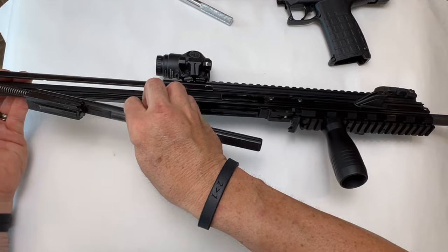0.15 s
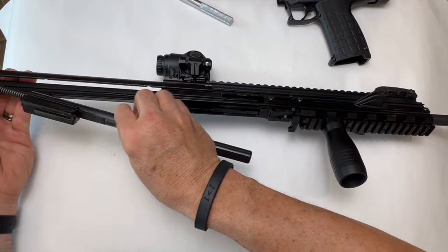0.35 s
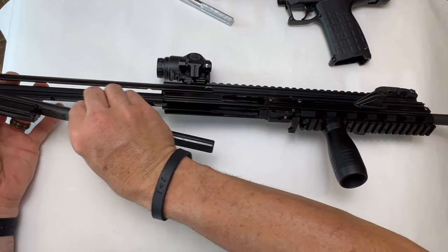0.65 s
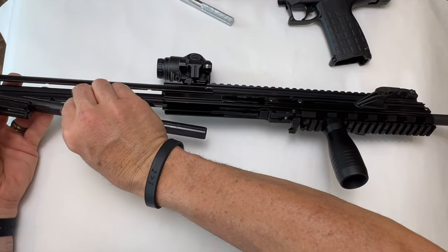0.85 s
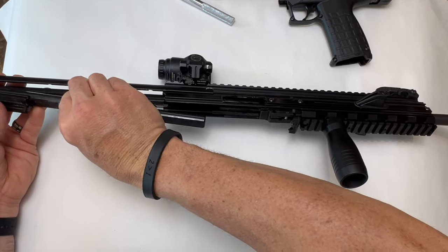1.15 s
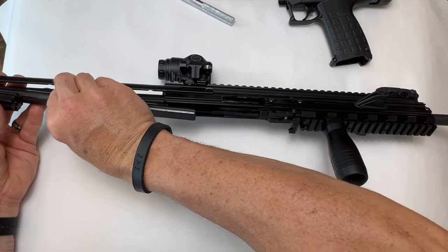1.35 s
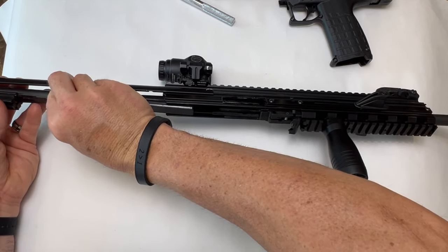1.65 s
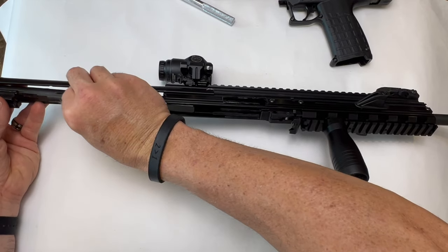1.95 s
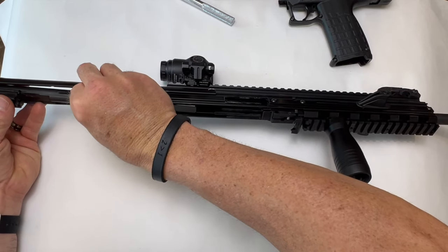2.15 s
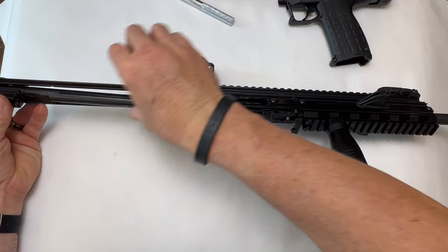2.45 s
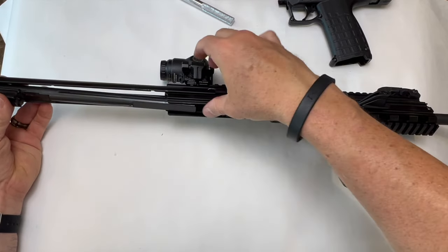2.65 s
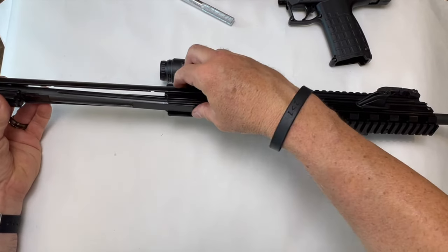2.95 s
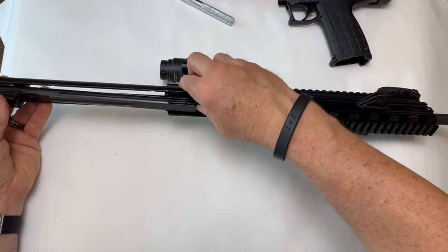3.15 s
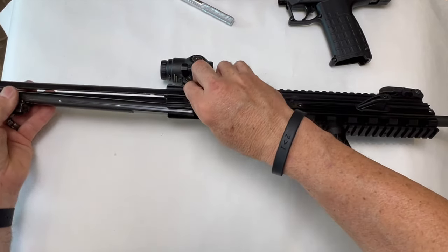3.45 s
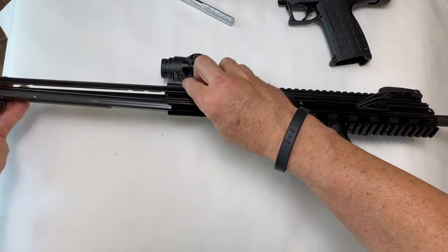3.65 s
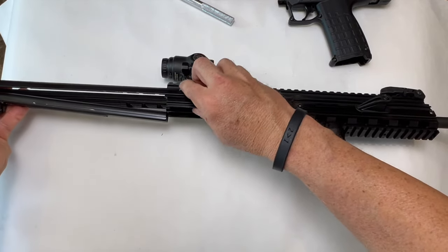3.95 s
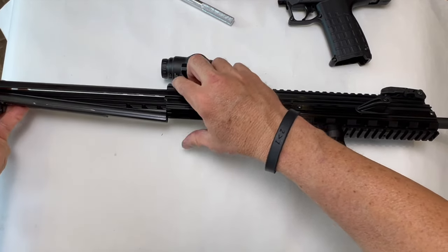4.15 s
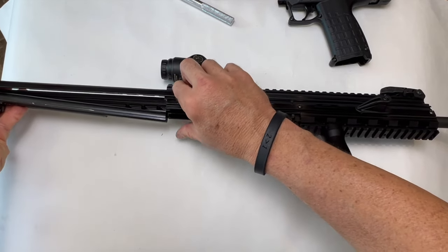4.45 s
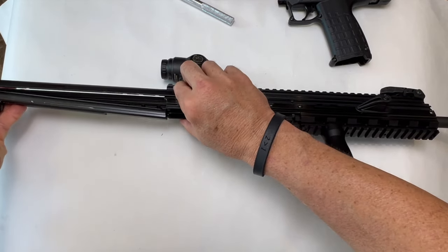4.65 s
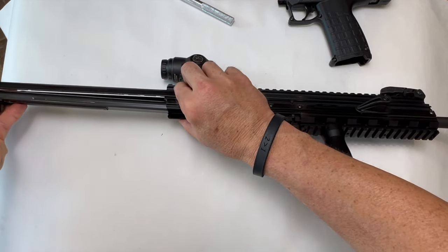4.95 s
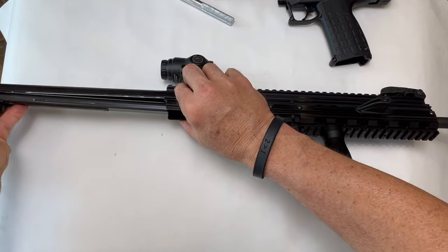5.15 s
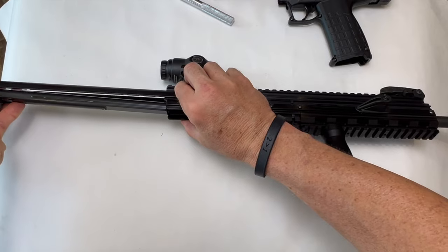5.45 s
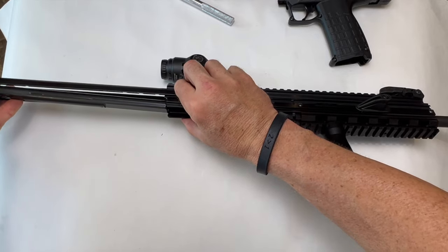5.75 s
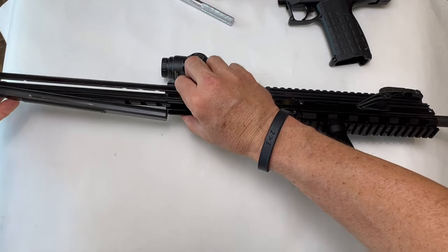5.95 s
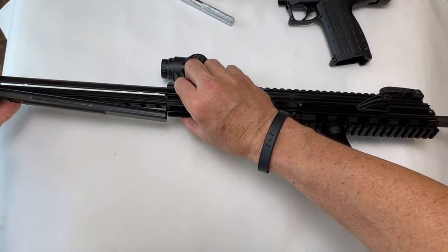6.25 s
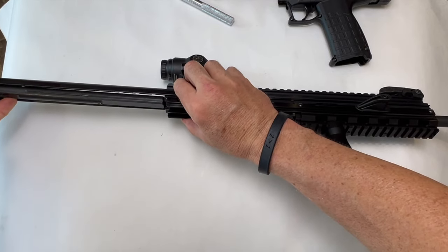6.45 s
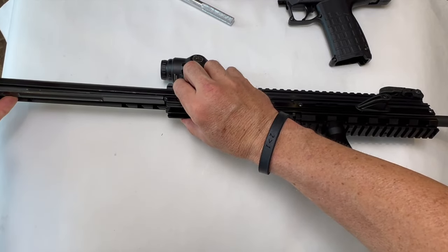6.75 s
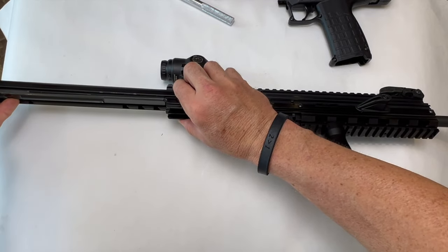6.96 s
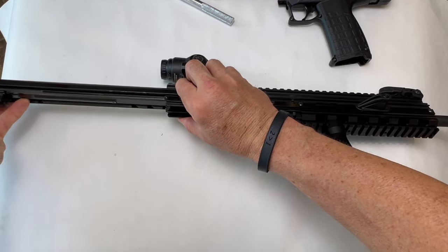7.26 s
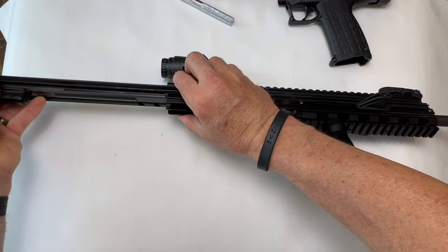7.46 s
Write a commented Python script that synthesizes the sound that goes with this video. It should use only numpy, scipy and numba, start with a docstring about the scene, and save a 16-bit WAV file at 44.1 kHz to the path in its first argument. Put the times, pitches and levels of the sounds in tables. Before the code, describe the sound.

Steel rods rasp in a channel and snap with loud dry knocks and dull table thumps, while a small room hums quietly behind.

```python
"""In a small room, steel and plastic rifle parts are fitted together on a tabletop.
Rods knock and rattle: short noise volleys crack and ring the steel and tube modes.
They also slide and rasp in their channels: uneven stick-slip noise through gliding resonances.
Heavy blows thump the table as soft pushes on its modes; the walls add a decaying noise tail.
Ventilation hums behind: shaped noise, wavering duct tones and a steady motor tone."""
import sys
import numpy as np
from scipy import signal
from scipy.fft import rfft, irfft, next_fast_len
from scipy.io import wavfile
from scipy.ndimage import uniform_filter1d
from numba import njit

SR = 44100
rng = np.random.default_rng(int(sys.argv[2]) if len(sys.argv) > 2 else 0)


def waveform_to_disk(signal):
    """Save audio, clipped to [-1, 1], as 16-bit WAV at the path in sys.argv[1]."""
    frames = np.transpose(np.atleast_2d(signal))
    scaled = np.clip(frames, -1, 1) * 32767
    samples = np.round(scaled).astype(np.int16)
    wavfile.write(sys.argv[1], SR, samples)


N = 335689

# modes of the steel rods and channel: (pitch [Hz], relative level [dB], 60 dB decay time [s])
STEEL_MODES = [(1100, 0, .012), (2200, -1, .02), (2500, 0, .018), (3050, -2, .015), (3400, -2, .018),
               (4220, -4, .02), (5857, -5, .025), (6500, -4, .025), (7000, -2, .018), (8400, -3, .025),
               (9300, -4, .025), (11450, -9, .025)]


def undb(db):
    """Decibels to an amplitude factor."""
    return 10 ** (np.asarray(db) / 20)


def unit(x):
    """Scale to an RMS of 1."""
    return x / np.sqrt(np.mean(x ** 2))


def on_log(curve, hz):
    """Read a (Hz, value) curve on a log frequency axis."""
    f, value = np.transpose(curve)
    return np.interp(np.log(hz + 1), np.log(f + 1), value)


def shape(x, gain):
    """Multiply the spectrum by gain(Hz)."""
    n = next_fast_len(x.shape[-1])
    hz = np.arange(n // 2 + 1) * SR / n
    return irfft(rfft(x, n) * gain(hz), n)[..., :x.shape[-1]]


def band(x, lo, hi):
    """Band-pass between two edges in Hz."""
    return signal.sosfilt(signal.butter(2, [lo, hi], "band", fs=SR, output="sos"), x)


@njit
def moving_band(x, hz, sharp):
    """State-variable band-pass whose centre moves; gain 1 at the centre, Q = sharp."""
    y, b, l, k = np.empty(len(x)), 0., 0., 1 / sharp
    for i in range(len(x)):
        g = np.tan(np.pi * hz[i] / SR)
        v = (b + g * (x[i] - l)) / (1 + g * (g + k))
        b, l, y[i] = 2 * v - b, l + 2 * g * v, k * v
    return y


@njit
def ring_modes(force, owner, poles, gains):
    """Decaying modes driven by a force; each event weighs the modes in its own way."""
    out = np.zeros(len(force))
    for m in range(len(poles)):
        z = 0j
        for i in range(len(force)):
            z = z * poles[m] + force[i] * gains[owner[i], m] + 1e-18
            out[i] += z.imag
    return out


def poles_of(modes):
    """Complex poles, pitches [Hz] and levels [dB] of a mode table."""
    hz, db, t60 = np.transpose(modes)
    return np.exp(2j * np.pi * hz / SR - np.log(1000) / (t60 * SR)), hz, db


def ventilation(air_db=-42.5, motor_hz=58.9, motor_db=-40.5):
    """Broad air rumble with wavering duct tones and a steady motor tone."""
    # air spectrum: (frequency [Hz], relative density [dB per Hz])
    air = [(30, -32), (50, -10), (90, -8), (170, -3), (270, -4), (450, -17), (650, -20), (1100, -30),
           (1900, -41), (3200, -44.5), (5100, -52), (6500, -46), (9500, -66), (15000, -66)]
    # width of the air: (frequency [Hz], side minus mid [dB])
    air_side = [(60, -4), (200, -11), (350, -0.5), (640, 9.5), (1150, 6.5), (2100, 2), (16000, 36)]
    # duct tones: (pitch [Hz], full width at half amplitude [Hz], RMS level [dB])
    duct_tones = [(59.64, 15, -58.5), (118.1, 0.52, -46.5), (207.6, 5.3, -46), (246, 10, -63.5),
                  (310, 11, -71), (358.1, 8.1, -56), (566, 90, -62)]
    mid, side = shape(rng.standard_normal((2, N)), lambda f: undb(on_log(air, f)))
    gain = undb(air_db) / np.sqrt(np.mean(mid ** 2))
    side = shape(side, lambda f: undb(on_log(air_side, f)))
    tones = undb(motor_db) * np.sin(2 * np.pi * motor_hz * np.arange(N) / SR)
    for hz, width, db in duct_tones:
        # a narrow band of noise wavers by itself
        tone = shape(rng.standard_normal(N), lambda f: 1 / (1 + (2 * (f - hz) / width) ** 2))
        tones = tones + undb(db) * unit(tone)
    return gain * np.array([mid + side, mid - side]) + tones


def held_noise(step):
    """Random values, each held for a number of samples."""
    return np.repeat(rng.standard_normal(N // step + 1), step)[:N]


def stroke_pressure(start_s, length_s, swell_db, levels_db):
    """Level curve of each layer: a stroke sets in and dies away, long ones more gently."""
    t = np.arange(N) / SR
    press = np.zeros((len(levels_db), N))
    for start, dur, swell, levels in zip(start_s, length_s, swell_db, undb(levels_db).T):
        i = slice(int(start * SR), int((start + dur + .3) * SR))
        age = t[i] - start
        set_in = np.clip(age / (.012 + .16 * dur), 0, 1)
        let_go = np.exp(-np.clip(age - dur, 0, None) / (.0065 + .043 * dur))
        swelling = undb(swell * (np.clip(age / dur, 0, 1) - .5))
        press[:, i] += levels[:, None] * set_in * let_go * swelling
    return press


def slides(grit_db=2.0, hiss_db=-6, hollow_sharp=3.6, ring_sharp=5.0, upper=1.27,
           slip_db=3.0, slip_ms=5.0, waver=.07, waver_ms=14, steel_db=-7):
    """Uneven stick-slip grit; the free length of rod and channel sets each stroke's resonances."""
    # strokes of sliding contact: (start [s], length [s], swell from start to end [dB], rasp level [dB],
    # hollow pitch [Hz], hollow level [dB], ring pitch [Hz], ring level [dB])
    strokes = [(0.0, 0.081, -29, -74, 1403, -54, 3055, -93),
               (0.102, 0.076, -18, -60.5, 1470, -58.5, 3020, -57.5),
               (0.253, 0.3, 2, -53.5, 1322, -68, 2820, -52.5),
               (.55, 0.25, -4.5, -50, 1136, -62, 3000, -49.5),
               (0.802, 0.23, 4, -51, 1030, -72, 3014, -53.5),
               (1.004, 0.18, -5.5, -41.5, 1020, -38.5, 2462, -44),
               (1.199, 0.067, 11, -37, 1363, -36, 2673, -29.5),
               (1.274, 0.14, 3.5, -41.5, 1570, -44.5, 2610, -37),
               (1.436, 0.069, -14, -38, 1467, -37.5, 2624, -30.5),
               (1.501, 0.021, -15, -33, 1845, -26, 2308, -31),
               (1.689, 0.029, -2, -50, 1230, -50, 2600, -47),
               (1.789, 0.29, 10, -60.5, 1251, -63, 3073, -64),
               (2.335, 0.027, 11, -63, 1743, -63, 2850, -64),
               (3.469, 0.23, 4.5, -34.5, 1500, -48, 3335, -42),
               (3.707, 0.089, -23, -37, 1960, -37, 4010, -37),
               (4.151, 0.11, -17, -57.5, 1324, -81, 3514, -68),
               (4.34, 0.05, 9, -55.5, 1764, -61, 3540, -73), (4.465, 0.2, -1, -61, 1782, -93, 3987, -69),
               (4.628, 0.073, -4, -47.5, 1867, -43.5, 2250, -76),
               (4.71, 0.077, -24, -54, 1810, -50.5, 3880, -48.5),
               (5.329, 0.085, -17, -52.5, 1500, -78, 3285, -55),
               (5.777, .14, 6, -49.5, 1602, -41, 4150, -51),
               (5.925, 0.072, -25, -43.5, 1477, -37, 4000, -43.5),
               (6.254, 0.081, 2, -41.5, 1733, -61, 3983, -43),
               (7.023, 0.068, 4, -70, 1622, -78.5, 3084, -55),
               (7.191, 0.097, -19, -37.5, 1718, -65, 3000, -37),
               (7.286, 0.14, 7, -53, 1690, -80, 3010, -77),
               (7.41, 0.35, -32.5, -49.5, 1773, -81, 3170, -50.5)]
    s, length, swell_db, rasp_db, hollow_hz, hollow_db, ring_hz, ring_db = np.transpose(strokes)
    t = np.arange(N) / SR
    slip_step, waver_step = int(slip_ms * SR / 1000), int(waver_ms * SR / 1000)

    slip = uniform_filter1d(held_noise(slip_step), slip_step // 2)
    grit = rng.standard_normal(N) * undb(grit_db * rng.standard_normal(N) + slip_db * slip)
    fine = grit * undb(-slip_db * slip / 2)  # the rasp runs more evenly

    def wander():
        return uniform_filter1d(held_noise(waver_step), waver_step)

    def resonate(hz, sharp):
        return moving_band(moving_band(grit, hz, sharp), hz, sharp)

    # the hollow pitch bends from stroke to stroke and jumps about
    gliding_hz = np.interp(t, s + length / 2, hollow_hz) * np.exp(waver * wander())
    # the rod keeps its pitch through a stroke, with half the waver
    stroke = np.clip(np.searchsorted(s, t) - 1, 0, None)
    held_hz = ring_hz[stroke] * np.exp(waver / 2 * wander())

    hollow = unit(resonate(gliding_hz, hollow_sharp))
    hollow = hollow + undb(hiss_db) * unit(band(grit, 1200, 3500))
    rod = unit(resonate(held_hz, ring_sharp))
    rod = rod + undb(-3) * unit(resonate(upper * held_hz, ring_sharp))
    rod = rod + undb(hiss_db) * unit(band(grit, 2100, 4000))
    # fast rasping is broad: it spills down over both resonances
    rasp = unit(band(fine, 4800, 14500))
    rasp -= undb(-4.5) * unit(band(fine, 940, 3600))
    # it also sets the steel singing
    poles, _, db = poles_of(STEEL_MODES)
    singing = ring_modes(fine, np.zeros(N, np.int64), poles, undb(db)[None])
    rasp += undb(steel_db) * unit(singing)

    press = stroke_pressure(s, length, swell_db, [hollow_db, ring_db, rasp_db])
    return press[0] * unit(hollow) + press[1] * unit(rod) + press[2] * rasp


def room(x, room_db=-11.5):
    """Decaying noise tail, unrelated at each side; each octave fades at its own rate."""
    # decay of the room: (frequency [Hz], 60 dB decay time [s])
    decay = [(200, 0.19), (2000, 0.46), (10000, 0.32)]
    t, tail = np.arange(SR // 2)[:, None] / SR, 0
    centres = 150 * 2. ** np.arange(7)  # octaves, Hz
    build_up = np.clip(t / 0.009, 0, 1)
    fades = np.exp(-np.log(1000) * t / on_log(decay, centres)) * build_up
    for hz, fade in zip(centres, fades.T):
        tail = tail + fade * band(rng.standard_normal((2, len(t))), hz / 2 ** .5, hz * 2 ** .5)
    tail = tail / np.sqrt(np.sum(tail ** 2) / 2)
    return undb(room_db) * signal.fftconvolve(x[None], tail, axes=1)[:, :N]


def knocks(grit_db=1.5, crack_db=(8, -1, 8), tube_db=-12, buzz_db=-20, buzz_ms=19.0, closing=1.11,
           scatter_db=6, steel_db=-34, tube_hz=1755, tube_t60_s=.022):
    """Each knock is a short volley of tiny impacts: a dry crack and a brief ring of rods and tube."""
    # knocks: (time [s], drive level [dB], low share [dB], high share [dB], tube tone share [dB],
    # rattle time constant [ms], held to 0.3 or more)
    knock_list = [(0.094, -44, 4.5, -3, -22, 0.17), (0.207, -38.5, 3.5, -10, -26, 0.38),
                  (0.821, -18, -57, -38, -21.5, 1.36), (1.007, -18, 7, -0.5, -34, 0.85),
                  (1.024, -17.5, -1.5, -32, -41, 0.87), (1.036, -20.5, 1, -22, -24, 0.99),
                  (1.198, -23, -16, -42, -30, 0.56), (1.215, -33.5, 2.5, -33, -29, 1.5),
                  (1.262, -27, -37, -10, -47, 1), (1.28, -32, -19, -46, -22, 1.3),
                  (1.441, -38, -54, -24, -44, 2.3), (1.496, -25, -54, -0.5, 0, 0.96),
                  (1.509, -28, 6, -41, -47, 1.3), (1.523, -29.5, 11.5, -6, -34, 2.3),
                  (1.530, -25.5, 11, -3, -35, 1.1), (1.539, -31, 0, -19, -32, 1.1),
                  (1.729, -35.5, 10, -7, -4, 2.6), (2.287, -50.5, -4, -64, -9, 2.1),
                  (3.24, -10, -22.5, -11, -44, 1.23), (3.388, -38, 4, -25, -16.5, 0.15),
                  (3.453, -12.5, -23, -13.5, -29, 1.6), (3.482, -36.5, -26, -24.5, 4, 0.62),
                  (3.495, -31.5, -1, -18.5, -0.5, 2.9), (3.647, -26, -28, -41, -36.5, 2.9),
                  (3.726, -38.5, 0, -2, -10, 1.6), (3.736, -24.5, -2, -8.5, -21, 1.4),
                  (3.75, -4, -27.5, -6.5, -22, 0.82), (3.765, -13.5, -10, -14.5, -40.5, 1.3),
                  (3.779, -12.5, -15.5, -17, -35.5, 1.2), (3.89, -13.5, -3, -12.5, -54, 2.87),
                  (4.024, -42.5, 4, 1.5, 1, 2.2), (4.16, -42, -18, -7, -36, 1.35),
                  (4.364, -47, -22, -6, 0.5, 1.35), (4.463, -42.5, -22, -12, -29, 2),
                  (4.499, -53.5, -17, 1, -9, 2), (4.622, -40, -15, -10, -35, 1.8),
                  (4.643, -37, -25, -21, 1.5, 4.1), (4.658, -24, 4.5, -12, -11, 0.59),
                  (4.743, -36.5, 1, -33.5, 3.5, 2.5), (4.817, -20.5, 0.5, -10.5, -21, 0.92),
                  (4.839, -22, -4.5, -53, -49, 3), (5.013, -35.5, -39.5, -39, -12, 3.3),
                  (5.248, -40.5, -42.5, -12.5, -41, 2), (5.262, -48, -29.5, -8.5, -40, 1.8),
                  (5.31, -23.5, -13.5, -13.5, -30, 1.5), (5.442, -28, -39, -20.5, -13.5, 1.4),
                  (5.641, -41.5, -29, -19, -13, 2.2), (5.904, -44.5, -9, -18, 9, 2.4),
                  (5.948, -33.5, 9, -9.5, -13.5, 2.5), (5.955, -29.5, -3.5, -18.5, -19, 1.9),
                  (5.981, -3, -29, -13, -21, 1.94), (6.028, -21, -2, -27, -6.5, 1.4),
                  (6.249, -45, -6.5, -20.5, 6, 5), (6.278, -34.5, -18.5, -18, 1, 4),
                  (6.301, -29, -8, -6, -3.5, 3.4), (6.346, -9, -21, -17.5, -5.5, 2.6),
                  (6.352, -5.5, -8.5, -3, -22, 1.8), (6.357, -5.5, -7, -6, -21.5, 3.14),
                  (6.932, -37, 8, -3.5, -23, 2.1), (7.037, -34, -9.5, -15, -15, 2.8),
                  (7.05, -32, -11, -15, -10, 1), (7.077, -35.5, -29, -7, -10, 1.4),
                  (7.183, -37, 2, -11, -22, 2.6), (7.193, -15.5, -1, -5.5, -5, 1.83),
                  (7.214, -16.5, -32, -26, 1.5, 1.6), (7.235, -30, -10, -25, -19, 1.2),
                  (7.245, -12.5, -11, -25, -48, 0.84), (7.37, -47.5, 16, 6, -12, 1.4),
                  (7.439, -37.5, -1.5, -8, 4, 2.9), (7.465, -26.5, -24, -9, -26, 1.2),
                  (7.508, -20.5, -29, -36, -7.5, 1.3), (7.558, -44, -19, -23, -17, 1.2)]
    s, drive_db, low_db, high_db, tone_db, ms = np.transpose(knock_list)
    force, owner = np.zeros(N), np.zeros(N, np.int64)
    t = np.arange(6000) / SR
    buzz = rng.standard_normal((len(s), 6000))
    grit = undb(grit_db * rng.standard_normal(buzz.shape))
    volley = unit(rng.standard_normal(buzz.shape) * grit)
    for k, i in enumerate((s * SR).astype(int)):
        age = t * 1000 / max(ms[k], .3)
        # the contact closes, then dies away
        contact = volley[k] * age ** closing * np.exp(-age)
        # loose parts buzz on a little
        loose = undb(buzz_db) * buzz[k] * np.minimum(age / 2, 1) * np.exp(-t * 1000 / buzz_ms)
        v = (contact + loose)[:N - i]
        force[i:i + len(v)] += 2 * undb(drive_db[k]) * v
        owner[i:] = k

    poles, hz, db = poles_of(STEEL_MODES)
    share = (hz < 2500) * low_db[:, None] + (hz > 5200) * high_db[:, None]
    scatter = scatter_db * rng.standard_normal((len(s), len(hz)))
    steel = ring_modes(force, owner, poles, undb(db + share + scatter))
    tube_pole = poles_of([(tube_hz, 0, tube_t60_s)])[0]
    tube = ring_modes(force, owner, tube_pole, undb(tone_db)[:, None])

    crack = band(force * undb(low_db[owner] + crack_db[0]), 720, 2500)
    crack -= band(force * undb(crack_db[1]), 2500, 6000)  # opposite sign, so that the bands join up
    crack += band(force * undb(high_db[owner] + crack_db[2]), 5500, 14000)
    return undb(steel_db) * steel + undb(tube_db) * tube, crack


def table_thumps(push_ms=4.0, fall_db=14.0):
    """A soft push bends the top; the place of the blow favours the modes near one pitch."""
    # blows that reach the table: (time [s], push level [dB], pitch that speaks most [Hz])
    blows = [(1.015, -17, 264), (1.06, -22, 263), (1.536, -18.5, 293), (1.74, -24, 213), (3.5, -22, 180),
             (3.896, -20.5, 136), (4.824, -21, 237), (4.848, -26.5, 237), (5.954, -19.5, 224),
             (6.032, -22, 215), (6.354, -12.5, 231), (6.385, -11, 160), (6.933, -36, 202),
             (7.198, -20, 240), (7.244, -24, 227)]
    # modes of the tabletop: (pitch [Hz], relative level [dB], 60 dB decay time [s])
    top_modes = [(125, -26.5, 0.12), (176.8, -7.5, 0.33), (213, -8.5, 0.89), (262, 4.5, 0.19),
                 (296, 2, 0.1), (378, -3, 0.13), (470, -19.5, 0.064)]
    s, push_db, best_hz = np.transpose(blows)
    at = (s * SR).astype(int)
    push = np.zeros(N)
    push[at] = undb(push_db)
    soft = signal.lfilter(np.hanning(int(push_ms * SR / 1000)) / (push_ms * SR / 2000), 1, push)
    poles, hz, db = poles_of(top_modes)
    # modes weaken by fall_db per octave away from the favoured pitch
    gains = undb(db - fall_db * np.abs(np.log2(hz / best_hz[:, None])))
    owner = np.clip(np.searchsorted(at, np.arange(N), "right") - 1, 0, None)
    top = ring_modes(soft, owner, poles, gains)
    return band(top, 120, 900)  # the thumps carry no deep bass below 120 Hz


def scene():
    """Sliding, knocks and thumps in the room, over the ventilation."""
    air = ventilation()
    sliding = slides()
    rings, crack = knocks()
    top = table_thumps()
    near = crack + sliding
    # the thin parts ring mostly toward the microphones; the walls return less of it
    to_walls = near + undb(-9) * rings + undb(-3) * top
    return near + rings + top + room(to_walls) + air


def record(dry):
    """Two microphone ports: phase between them turns with pitch; overloads clip; both ends are cut."""
    # microphone response: (frequency [Hz], gain [dB])
    mic = [(4500, -2), (6200, 2), (8000, 1), (10000, -3.5), (12500, -2), (14000, -1.5), (16000, -19)]
    # left-right difference that is kept: (frequency [Hz], gain [dB])
    port_side = [(60, -11), (3500, -0.5), (5000, -5.5), (6200, -30), (7500, -8.5), (11000, -7.5),
                 (13000, -25.5), (16000, -47)]
    # phase by which the left port leads, negative when it lags: (frequency [Hz], lead [rad])
    port_lead = [(0, 0), (3500, -.3), (4900, -1), (5070, -3), (5230, -5.7), (6800, -6.4), (8400, -7.3),
                 (10300, -7.7), (11700, -8.5), (12700, -8.9), (13200, -9.42)]
    dry = signal.sosfilt(signal.butter(3, 45, "high", fs=SR, output="sos"), dry)
    dry = shape(dry, lambda f: undb(on_log(mic, f)))
    mid, side = (dry[0] + dry[1]) / 2, (dry[0] - dry[1]) / 2
    side = shape(side, lambda f: undb(on_log(port_side, f)))
    left = shape(mid + side, lambda f: np.exp(.5j * on_log(port_lead, f)))
    right = shape(mid - side, lambda f: np.exp(-.5j * on_log(port_lead, f)))
    clipped = np.clip([left, right], -1, 1)
    top_cut = signal.ellip(8, .2, 70, 15800, fs=SR, output="sos")  # steep cut at 15.8 kHz
    return signal.sosfilt(top_cut, clipped)


dry = scene()
out = record(dry)
waveform_to_disk(out)
```